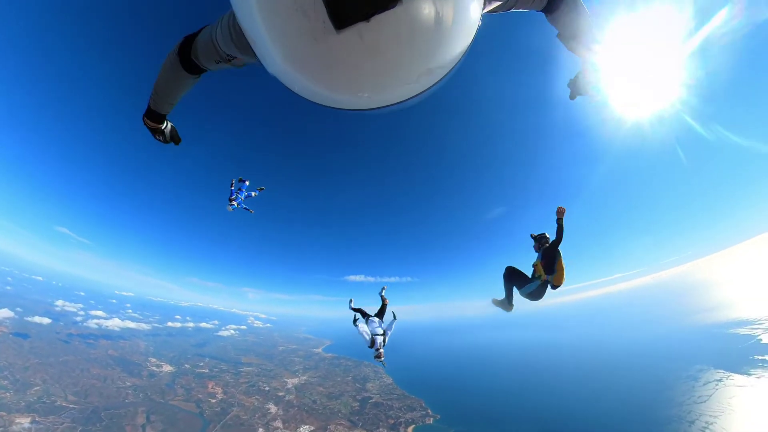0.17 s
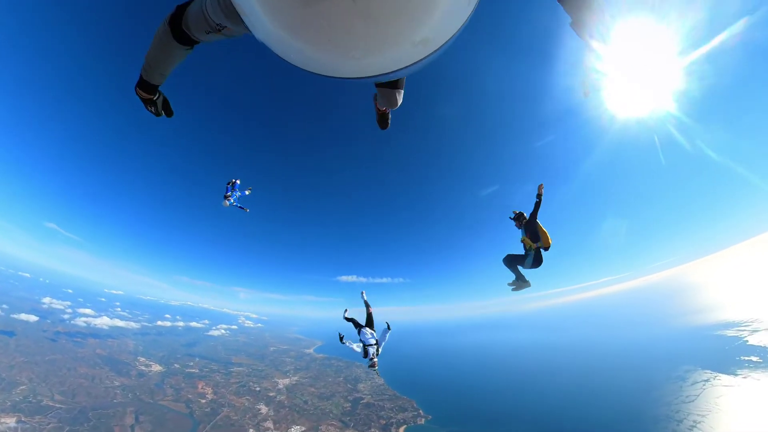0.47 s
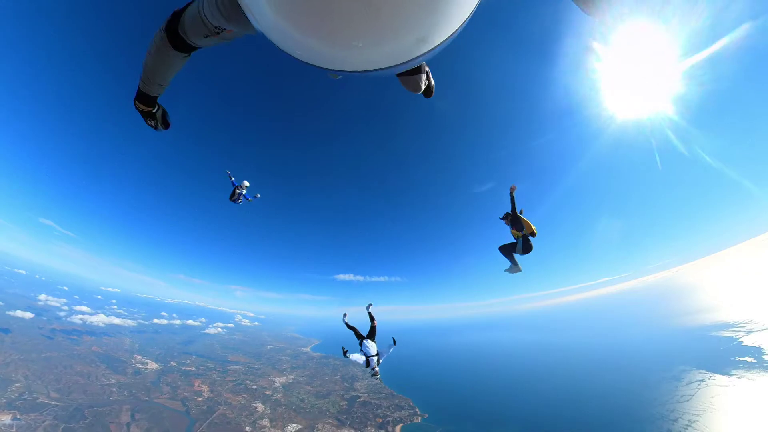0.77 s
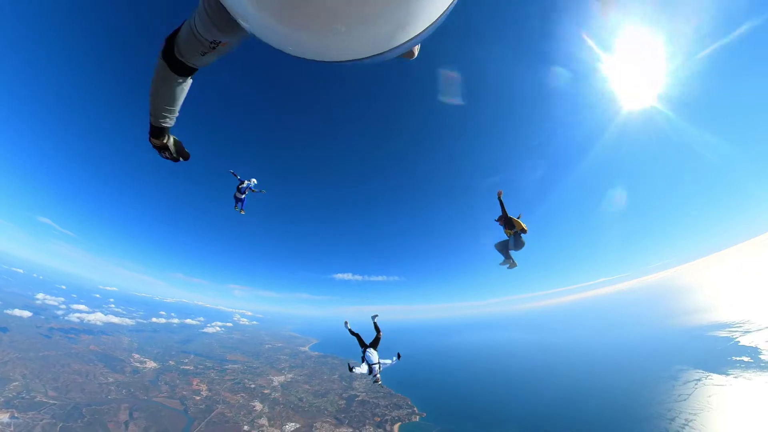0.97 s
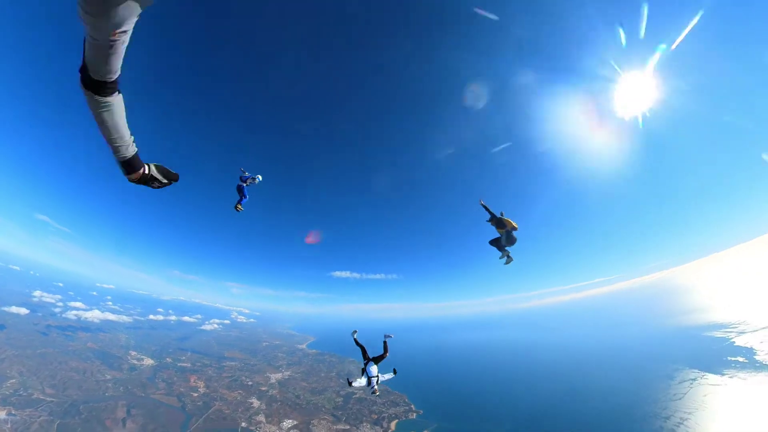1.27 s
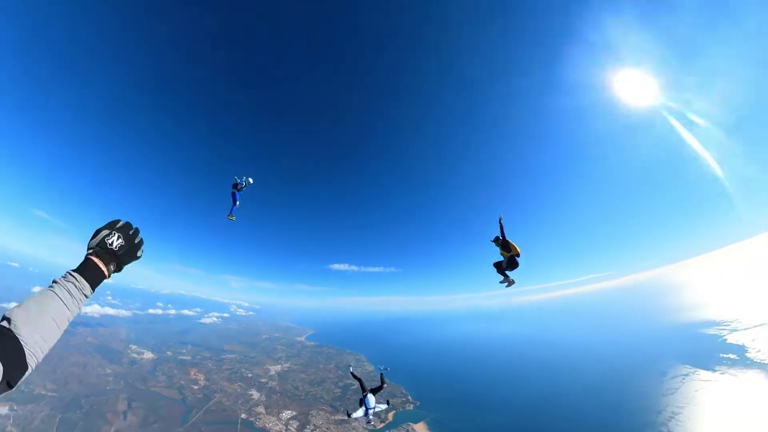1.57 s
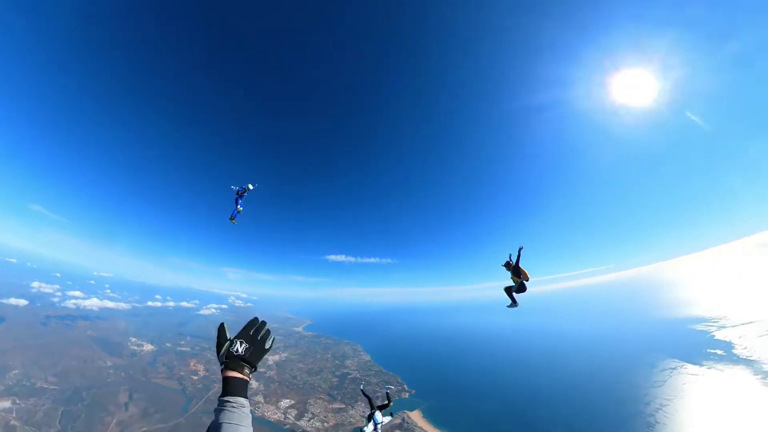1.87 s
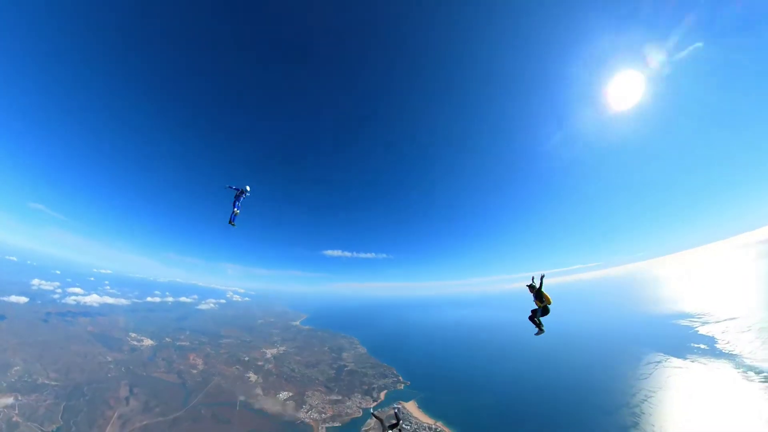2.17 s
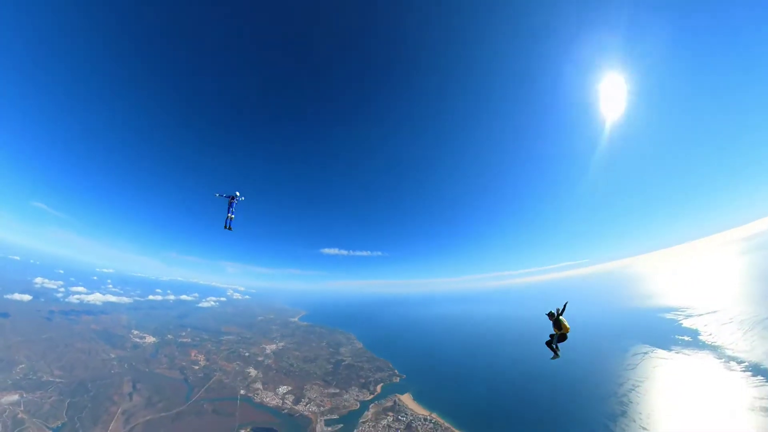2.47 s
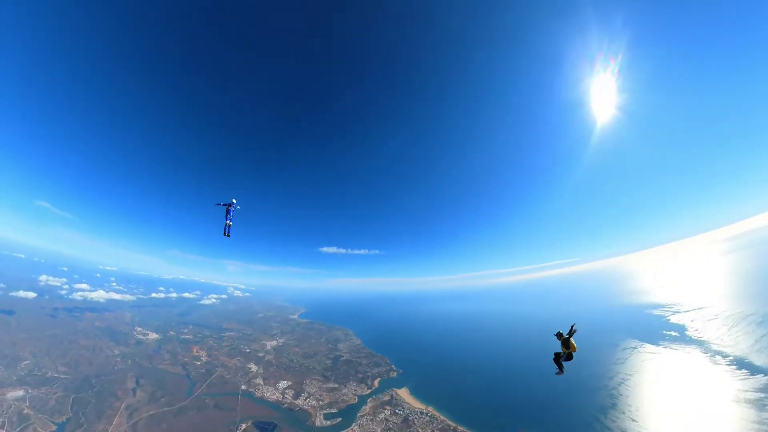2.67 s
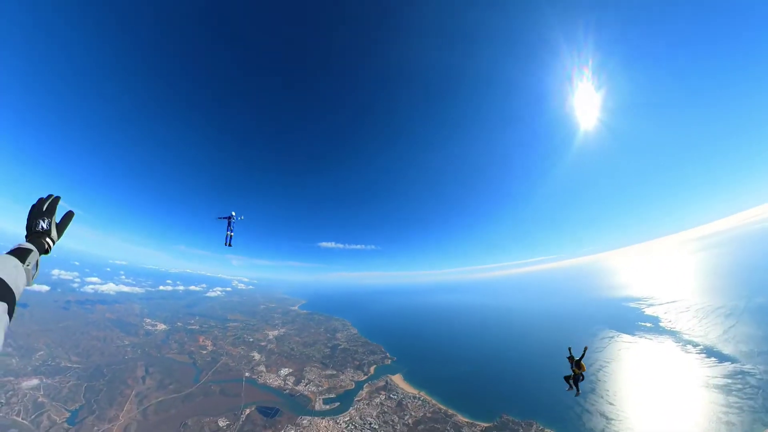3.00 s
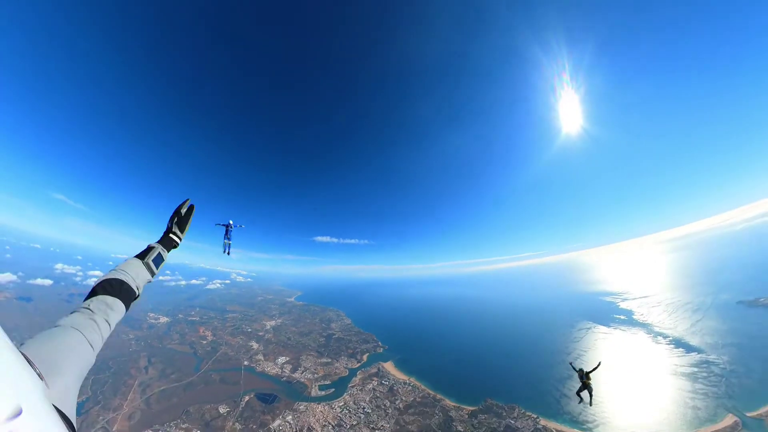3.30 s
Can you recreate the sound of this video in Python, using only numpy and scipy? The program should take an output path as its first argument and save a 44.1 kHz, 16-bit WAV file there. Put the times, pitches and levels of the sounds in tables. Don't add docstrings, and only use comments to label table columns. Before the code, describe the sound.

Violent freefall wind roars right at a helmet camera's microphone, low, muffled and overloaded, with irregular strap-like thumps until about 1.3 s. Around 1.4-1.6 s it takes on a higher fluttering hum, then surges unevenly until 1.95 s. From 2.0 to 2.6 s the roar mostly drops out, leaving clusters of hard pops and gaps. Faint ticks follow, then from 2.8 s dense, crackling, choppy wind continues to the end.

```python
import sys
import numpy as np
from scipy import signal
from scipy.io import wavfile
from scipy.ndimage import uniform_filter1d

SR = 44100
rng = np.random.default_rng(int(sys.argv[2]) if len(sys.argv) > 2 else 0)


def volts(x):
    e = np.asarray(x, float) / 20
    return 10 ** e


def inscribe(sig):
    pcm = np.round(np.clip(np.atleast_2d(sig).T, -1, 1) * 32767)
    wavfile.write(sys.argv[1], SR, pcm.astype(np.int16))


N = 151704

# start in seconds, level in dB, push toward a stop (in soft-stop units),
# eddy shedding pitch in Hz, shedding level in dB, hiss in dB.
AIRSTREAM = [(0, -27.5, -1.6, 200, -23, 0), (.5, -24, -1.3, 230, -9.5, 2),
             (.86, -22.5, -0.33, 200, -12.5, 4), (.96, -30, -0.29, 230, -8.5, 6),
             (1.15, -20, -0.39, 200, -9, -0.5), (1.2, -20.5, 0.62, 200, -3.5, -7),
             (1.43, -21, 0, 300.2, -4, 0), (1.51, -21.5, 0, 409.6, 5.5, 3.5),
             (1.605, -18, 0, 240, 1.5, -11), (1.66, -48, 0.42, 250, -8.5, -5.5),
             (1.795, -22, -0.078, 400, -5.5, -12.5), (1.93, -14.5, -0.27, 300, -7.5, -11.5),
             (1.975, -66, .5, 250, -5.5, -4.5), (2.52, -85, 0.85, 250, -5.5, -5.5),
             (2.66, -49, 1.2, 300, -14.5, -1.5), (2.762, -49.5, 2.9, 300, -17, 11.5),
             (2.79, -29, 1.03, 300, -8, 3.5), (3.44, -25.5, 1.4, 250, -13.5, 0.5)]
# start in seconds, pitch in Hz, level against the turbulence in dB.
WHISTLE = [(0, 3336, -31.5), (.43, 2817, -34.5), (.62, 3300, -33), (.85, 3200, -34.5), (.95, 3100, -42.5),
           (1.28, 1729, -42.5), (1.4, 3185, -44.5), (1.5, 4753, -60.5), (1.56, 5900, -50),
           (1.62, 6330, -73), (3.44, 4130, -75)]
# frequency in Hz, density in dB per Hz.
TURBULENCE_SPECTRUM = [(30, 8.5), (80, 0), (250, -2.5), (500, -10), (1000, -32.5), (2000, -44),
                       (3500, -55.5), (6500, -71.5)]
# centre in seconds, half-length in seconds,
# hiss in dB, rumble in dB.
EDDY_SWELLS = [(0.224, 0.073, 2.5, 7), (0.326, 0.034, -3.5, 2), (0.595, .07, 3, 5.5),
               (0.844, 0.023, 2.5, 4), (1.008, 0.033, 3.5, 6), (1.113, 0.056, 4, -2), (1.256, .04, -1.5, 7),
               (1.359, 0.064, 2.5, 2), (1.512, 0.026, -2, -4.5), (1.727, .07, 2.5, -9),
               (1.88, 0.028, -10, 0.5), (2.626, .03, -8, 1), (3.382, .03, 2.5, 0)]
# start in seconds, length in seconds, gain change in dB.
LULLS = [(0.318, 0.028, -0.5), (1.824, 0.029, 4), (1.898, 0.017, -4.5), (2.0, .2, -12), (2.24, .06, -8),
         (2.426, 0.098, -8.5), (3.046, 0.0049, -11), (0.833, 0.014, -9.5), (2.91, 0.0039, -15.5),
         (2.954, 0.011, -4), (3.117, 0.014, -7), (3.204, 0.028, -6.5), (3.255, 0.013, 1),
         (3.281, 0.012, -22.5), (3.349, 0.014, -13.5)]
# start in seconds, length in seconds, level in dB.
FREED = [
    (2.606, 0.03, -24.5),
]
# time in seconds, # jump in
FLIPS = [(2.0095, 0.51), (2.0356, -0.4), (2.0366, 0.17), (2.0547, 0.51), (2.238, -0.82), (2.2388, 0.19),
         (2.2392, -0.86), (2.2398, 0.81), (2.3084, 0.47), (2.3094, 0.5), (2.31, -0.54), (2.3108, 0.7),
         (2.3339, -0.47), (2.3354, -0.49), (2.3362, 0.53), (2.3516, 0.3), (2.3521, 0.28), (2.3633, -0.64),
         (2.3639, 0.12), (2.3404, -.05), (2.3686, -0.11), (2.3719, -0.04), (2.3848, -0.22), (2.3859, 0.68),
         (2.3998, -0.59), (2.4005, 0.29), (2.5583, -0.19), (2.559, 0.72), (2.5653, -0.63), (2.5662, 0.4),
         (2.5876, -0.22), (2.5882, 0.03), (2.5893, 0.44), (2.5922, -0.26), (2.5927, -0.25),
              (2.5939, 0.54), (2.5978, -0.46), (2.5989, 0.43), (2.6394, -0.26), (2.6408, 0.44),
              (2.6595, -0.09), (2.6736, -0.16), (2.6748, 0.1), (2.6804, -0.22), (2.6819, 0.16),
              (2.7104, -0.04), (2.7361, -0.16), (2.7372, 0.16)]
# centre in seconds, depth in full scale, length in milliseconds.
STOP_DIPS = [(1.927, .25, 1.5), (2.6064, .14, 1.5), (2.6132, .25, 1.), (2.6169, .42, 1.4),
             (2.62, .17, 1.1), (2.6227, .45, 1.2), (2.6275, .3, 1.2), (2.6999, .09, 2.), (2.7332, .03, .9),
             (2.7423, .04, 1.), (2.7531, .04, .9), (2.756, .07, 1.), (2.7735, .1, 1.5), (2.789, .15, 1.2),
             (2.798, .15, 2.), (2.839, .2, 1.2),
             (2.8773, 0.3, 2.9), (2.9005, 0.38, 1.2), (2.9051, 0.41, 1.3), (2.9324, 0.42, 1.1),
        (2.9445, 0.31, 3.8), (2.9529, 0.35, 1.3), (2.9705, 0.44, 1.0), (3.0013, 0.47, 1.9),
        (3.032, 0.53, 1.1), (3.061, 0.36, 2.4), (3.0777, 0.37, 2.2), (3.0799, 0.29, 1.5),
        (3.103, 0.55, 1.5), (3.1062, 0.54, 1.4), (3.1117, 0.41, 1.6), (3.1535, 0.43, 1.5),
        (3.1656, 0.33, 2.0), (3.1706, 0.34, 0.8), (3.1796, 0.36, 1.2), (3.2096, 0.49, 1.2),
        (3.2119, 0.35, 1.1), (3.2564, 0.43, 1.2), (3.2613, 0.48, 0.9), (3.2988, 0.49, 1.2),
        (3.3073, 0.33, 2.2), (3.3244, 0.43, 0.9), (3.3377, 0.36, 1.3), (3.341, 0.36, 0.9),
        (3.4111, 0.44, 2.0), (3.4189, 0.32, 1.2)]
# centre in seconds, depth in full scale, length in milliseconds.
SMALL_DIPS = [(2.7811, 0.16, 1.1), (2.7851, 0.13, 1.1), (2.8032, 0.15, 0.9), (2.8056, 0.14, 0.8),
              (2.8129, 0.16, 2.2), (2.826, 0.13, 1.0), (2.8299, 0.18, 1.9), (2.856, 0.2, 1.7),
              (2.8609, 0.22, 2.3), (2.8644, 0.18, 1.0), (2.8676, 0.16, 1.5), (2.8709, 0.22, 1.7),
              (2.8846, 0.15, 2.7), (2.8966, 0.16, 1.5), (2.9151, 0.13, 0.9), (2.9288, 0.13, 1.8),
              (2.942, 0.22, 1.2), (2.9499, 0.31, 2.4), (2.9752, 0.16, 1.0), (2.9775, 0.15, 0.9),
              (2.9799, 0.19, 1.0), (3.0058, 0.18, 1.1), (3.0075, 0.24, 1.0), (3.0183, 0.19, 1.5),
              (3.0241, 0.14, 0.9), (3.0592, 0.19, 2.7), (3.0762, 0.16, 1.4), (3.101, 0.16, 0.8),
              (3.1382, 0.2, 2.0), (3.151, 0.17, 0.9), (3.1587, 0.16, 1.1), (3.1917, 0.17, 1.0),
              (3.2366, 0.14, 1.7), (3.2586, 0.22, 1.1), (3.2772, 0.19, 1.1), (3.3227, 0.17, 0.8),
              (3.3666, 0.2, 1.5), (3.3696, 0.17, 1.1), (3.3771, 0.31, 1.3), (3.3916, 0.31, 1.0),
              (3.3975, 0.2, 1.4), (3.4029, 0.18, 2.5), (3.4058, 0.19, 1.0), (3.4277, 0.16, 1.7),
              (3.4361, 0.19, 1.6)]
# time in seconds, size in full scale.
STRAP_SLAPS = [(.002, 0.52), (0.028, 0.32), (.038, 0.27), (0.052, .25), (0.081, 0.16), (.126, 0.22),
               (.165, 0.33), (0.109, 0.22), (.117, 0.23), (0.178, 0.44), (0.193, 0.21), (0.214, 0.4),
               (0.28, 0.41), (.305, 0.62), (0.35, 0.44), (.414, 0.27), (0.433, 0.33), (.512, 0.35),
               (.522, 0.28), (0.581, 0.17), (0.604, 0.16), (0.661, 0.34), (0.809, 0.43), (.828, 0.49),
               (0.847, 0.21), (0.854, 0.4), (.872, 0.19), (0.907, 0.31), (0.986, 0.27), (1.081, 0.38),
               (1.17, 0.55), (1.218, 0.28), (1.268, 0.22), (1.826, 0.32)]
# centre in seconds, half-length in seconds, pitch in Hz, level in dB.
CHATTER = (2.3097, .0005, 3000, -34)
# time in seconds, peak in dB.
SEAMS = [(1.652, -64), (1.812, -52), (1.872, -56), (1.917, -54), (1.928, -48), (1.962, -60), (1.972, -62),
         (2.102, -58), (2.222, -42), (2.282, -47), (2.332, -50), (2.352, -44), (2.372, -50), (2.432, -64),
         (2.442, -60), (2.542, -44), (2.552, -58), (2.572, -54), (2.602, -56), (2.682, -48), (2.699, -52),
         (2.711, -54)]

DRIVE, PATCHY_DB, GUST_DB = 0.91, 1, 1.2
STOP = .33
HISS_FROM_HZ, RUMBLE_HZ = 756, 108
WHISTLE_WIDTH_HZ, SHED_WIDTH_HZ = 480, 60
FLIP_S, CRACK_S, CRACK_SHARE = .0004, .00011, .06
DIP_SHARE, SMALL_DIP_GAIN = .85, 1.46
SLAP_FALL_S = .009
LOW_CUT_HZ, TREBLE_CUT_HZ = 61, 7700
FRAME_S = .02
EARLY_GHOST_DB, LATE_GHOST_DB, GHOST_LOSS_DB = -23.5, -29, -8
TONE_HZ, TONE_DB = 15728, -70


def in_time(rows):
    s, *columns = np.transpose(rows)
    return [np.interp(np.arange(N) / SR, s, c) for c in columns]


def rms_one(x):
    return x / np.sqrt(np.mean(np.abs(x) ** 2) + 1e-20)


def drift(rate_hz):
    r = np.exp(-2 * np.pi * rate_hz / SR)
    noise = rng.standard_normal(N + SR)
    return rms_one(signal.lfilter([1], [1, -2 * r, r * r], noise)[SR:])


def narrow(hz, width_hz):
    swell = drift(width_hz) + 1j * drift(width_hz)
    size = np.abs(swell)
    swell = swell * np.tanh(size / 1.2) / (size + 1e-9)
    carrier = np.exp(2j * np.pi * np.cumsum(hz) / SR)
    return rms_one((swell * carrier).real)


def window(start, length):
    t = np.arange(N) / SR
    return np.clip(np.minimum(t - start, start + length - t) / .004 + .5, 0, 1)


def faint_tone(x):
    loud = uniform_filter1d(np.abs(x), size=400)
    return volts(TONE_DB) * loud ** 2 * 10 * narrow(np.full(N, TONE_HZ), 40)


def ghosts(x):
    lag = int(FRAME_S * SR)
    dull = signal.sosfilt(signal.butter(2, [110, 1100], "band", fs=SR, output="sos"), x)
    out = volts(EARLY_GHOST_DB) * np.r_[dull[lag:], np.zeros(lag)]
    for k in range(1, 5):
        out[k * lag:] += volts(LATE_GHOST_DB + GHOST_LOSS_DB * (k - 1)) * dull[:N - k * lag]
    return out


def seam_clicks():
    seams = np.zeros(N)
    for s, db in SEAMS:
        seams[int(s * SR)] = volts(db)
    return -signal.lfilter([1], [1, -.9], seams)


def chatter():
    s, half_length, hz, db = CHATTER
    since = (np.arange(N) / SR - s) / half_length
    return volts(db) * np.exp(-since ** 2) * np.sin(2 * np.pi * hz * half_length * since)


def strap_slaps():
    kicks = np.zeros(N)
    for s, size in STRAP_SLAPS:
        kicks[int(s * SR)] = size
    sag = signal.lfilter([1], [1, -np.exp(-1 / (SLAP_FALL_S * SR))], kicks + 1e-18)
    return signal.sosfilt(signal.bessel(4, 1050, fs=SR, output="sos"), sag)


def flips():
    t = np.arange(N) / SR
    small = [(s, SMALL_DIP_GAIN * depth, ms) for s, depth, ms in SMALL_DIPS]
    jumps = FLIPS
    for s, depth, ms in [*STOP_DIPS, *small]:
        for way in (-1, 1):
            jumps.append((s + way * ms / 2000, way * DIP_SHARE * depth))
    out = np.zeros(N)
    reach = SR // 200
    for s, jump in jumps:
        i = int(s * SR)
        near = t[i - reach:i + reach] - s
        crack = np.sign(near) * (1 - np.exp(-np.abs(near) / CRACK_S))
        swing = (1 - CRACK_SHARE) * np.tanh(near / FLIP_S) + CRACK_SHARE * crack
        out[i - reach:i + reach] += jump / 2 * (1 + swing)
        out[i + reach:] += jump
    return out


def turbulence():
    out = 0
    edges = 25 * 2 ** np.arange(0, 8.6, .5)
    white = rng.standard_normal((2, N))
    hz, db = np.transpose(TURBULENCE_SPECTRUM)
    for k, (low, high) in enumerate(zip(edges, edges[1:])):
        band = signal.sosfilt(signal.butter(3, [low, high], "band", fs=SR, output="sos"), white[k % 2])
        band_db = np.interp(np.log(low * high) / 2, np.log(hz), db)
        out = out + band * volts(band_db + PATCHY_DB * drift(35))
    return rms_one(out)


def capsule(push, shed_hz, shed_db):
    air = turbulence()
    pushes = np.linspace(-4, 4, 33)
    trial = np.tanh(pushes[:, None] + DRIVE * air[::50])
    rest = np.interp(push, pushes, trial.mean(axis=1))
    swing = np.interp(push, pushes, trial.std(axis=1))
    squeezed = (np.tanh(push + DRIVE * air) - rest) / swing
    hum = volts(shed_db) * narrow(shed_hz, SHED_WIDTH_HZ)
    return (squeezed + hum) / np.sqrt(1 + volts(shed_db) ** 2)


def eddy_swells(column):
    t = np.arange(N) / SR
    return sum(row[column] * np.exp(-((t - row[0]) / row[1]) ** 2) for row in EDDY_SWELLS)


def roar():
    level_db, push, shed_hz, shed_db, hiss_db = in_time(AIRSTREAM)
    lull_db = sum(db * window(s, length) for s, length, db in LULLS)
    gain = volts(level_db + GUST_DB * drift(55) + lull_db)
    gain = gain + sum(volts(db) * window(s, length) for s, length, db in FREED)
    hiss_db = hiss_db + eddy_swells(2)
    deeper_db = eddy_swells(3)
    both = capsule(push, shed_hz, shed_db) + capsule(push, shed_hz, shed_db)
    rumble = signal.lfilter(*signal.butter(1, RUMBLE_HZ, fs=SR), both)
    both = both + (volts(deeper_db) - 1) * rumble

    def split(side):
        once = signal.butter(2, HISS_FROM_HZ, side, fs=SR, output="sos")
        return signal.sosfilt(np.tile(once, (2, 1)), both)

    low, hiss = split("low"), split("high")
    whistle_hz, whistle_db = in_time(WHISTLE)
    whistle = volts(whistle_db) * narrow(whistle_hz, WHISTLE_WIDTH_HZ)
    stopped = STOP * np.tanh(gain * low / STOP)
    held = signal.sosfilt(signal.butter(2, 1600, fs=SR, output="sos"), stopped)
    return held + gain * (volts(hiss_db) * hiss + whistle)


def scene():
    return (strap_slaps() + flips() + roar())[None]


def roll_off(x):
    return signal.sosfilt(signal.butter(12, 15900, fs=SR, output="sos"), x)


def record(dry):
    x = signal.sosfilt(signal.butter(3, LOW_CUT_HZ, "high", fs=SR, output="sos"), dry[0])
    out = x + ghosts(x) + seam_clicks() + chatter()
    out = signal.sosfilt(signal.cheby2(8, 45, TREBLE_CUT_HZ, fs=SR, output="sos"), out)
    out = out + faint_tone(x)
    return roll_off(out[None])


dry = scene()
out = record(dry)
inscribe(out)
```